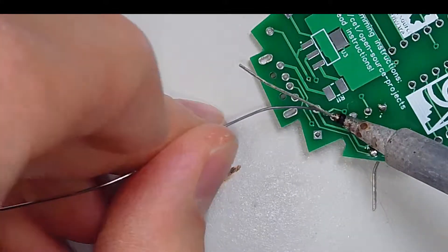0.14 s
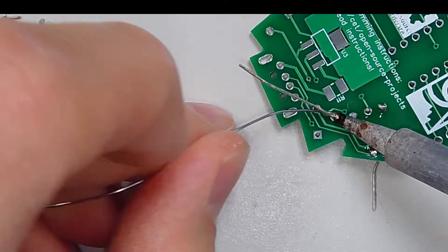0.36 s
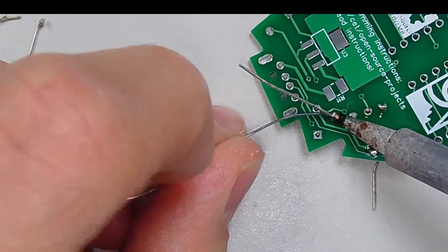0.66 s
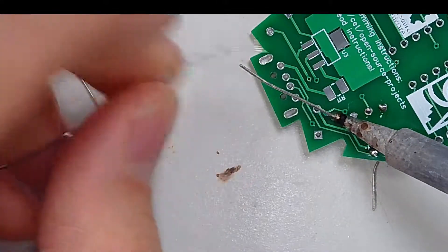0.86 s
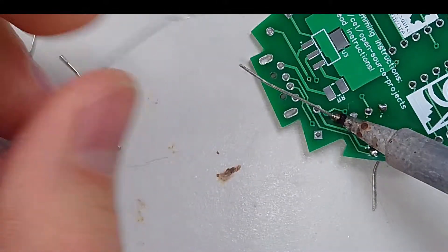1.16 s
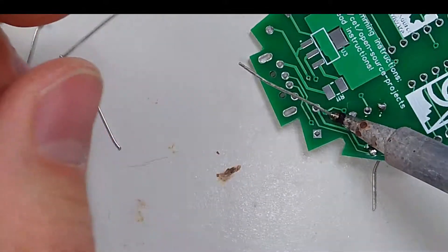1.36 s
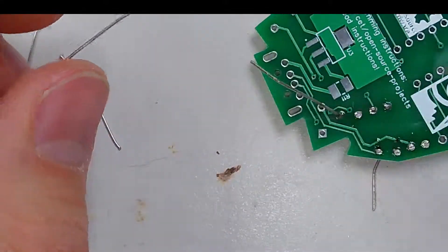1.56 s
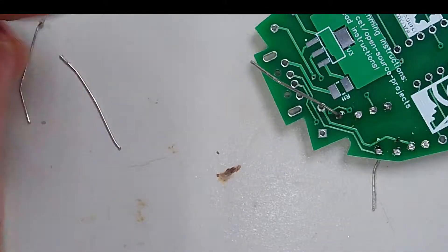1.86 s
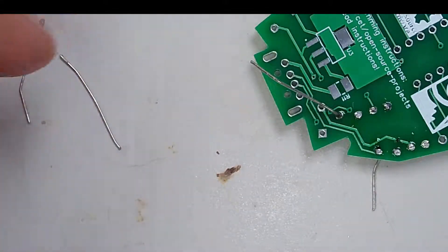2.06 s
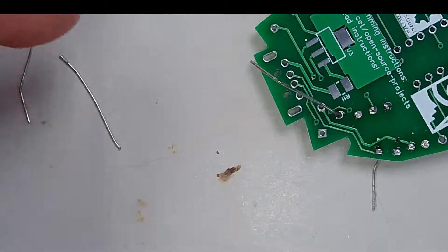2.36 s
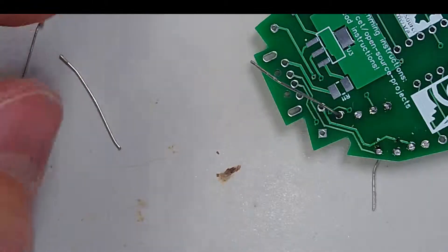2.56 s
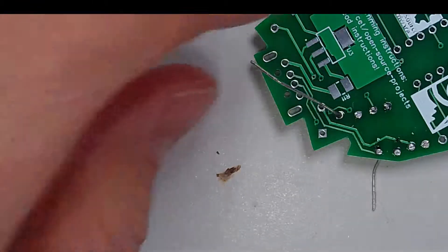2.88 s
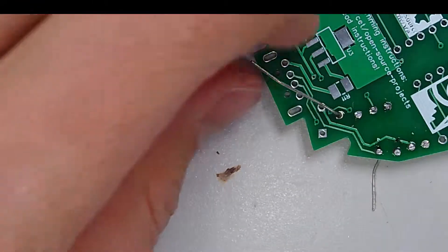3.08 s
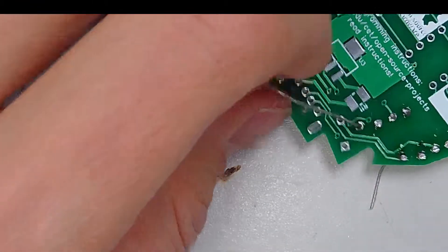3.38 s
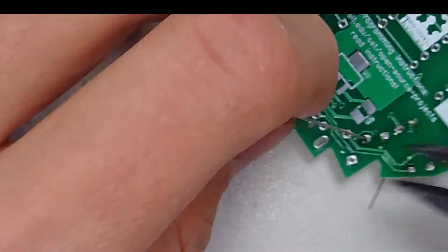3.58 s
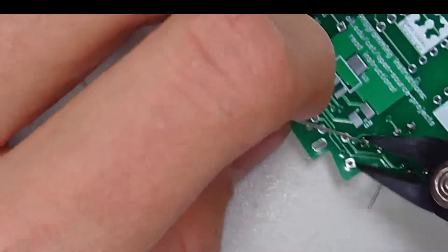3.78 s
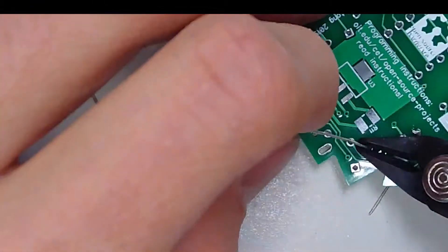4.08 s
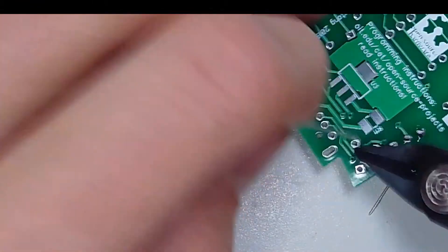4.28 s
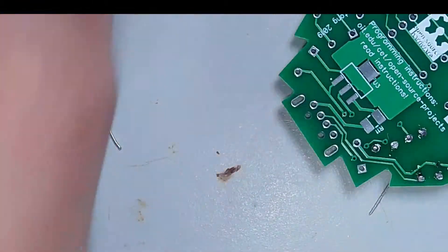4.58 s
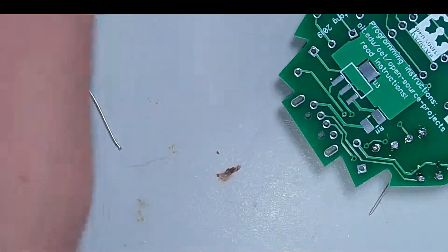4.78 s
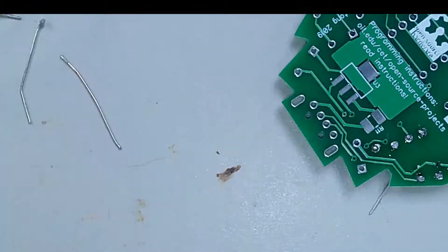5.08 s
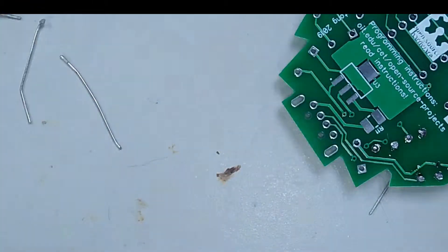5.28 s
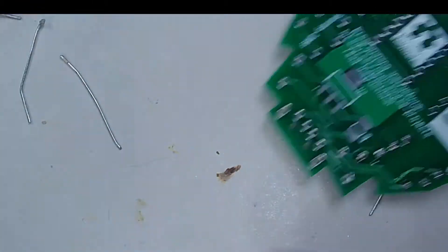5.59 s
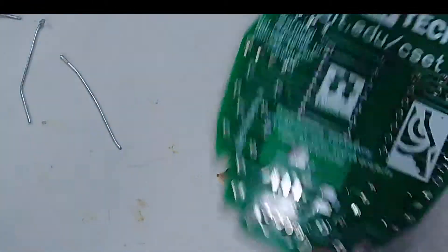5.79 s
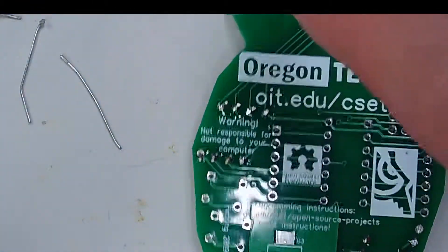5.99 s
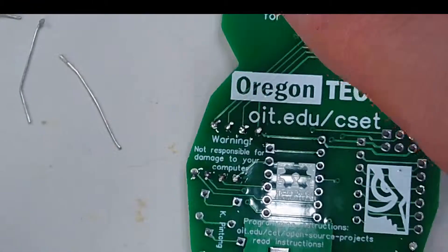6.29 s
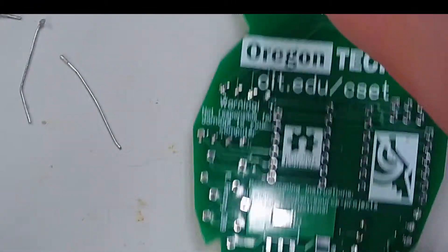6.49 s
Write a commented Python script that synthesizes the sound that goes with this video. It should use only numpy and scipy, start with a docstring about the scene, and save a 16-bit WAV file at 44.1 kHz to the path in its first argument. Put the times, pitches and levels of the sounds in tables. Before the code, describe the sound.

Small wire ticks, crisp cutter snaps, a steel tool clacking down, hard bench knocks and light board scraping, with a steady low room hum.

```python
"""At a hard bench in a ventilated room, flush cutters snip wire leads on a circuit board, tools are set down,
and the board is slid and nudged. Impacts are noise cracks with decaying modes; bouncing, sliding and handling
are random contacts that excite resonances; skin brushes as hiss; ventilation rumbles in the low room modes. One
close microphone hears it all; a duller, fainter microphone track is mixed in slightly ahead, so each loud blow
is foretold by a soft copy of itself."""
import sys
import numpy as np
from scipy import signal
from scipy.fft import rfft, irfft, next_fast_len
from scipy.io import wavfile

SR = 44100
rng = np.random.default_rng(int(sys.argv[2]) if len(sys.argv) > 2 else 0)


def boost_factor(decibels):
    """Convert a level in decibels to a linear amplitude factor."""
    exponent = np.asarray(decibels, float) / 20
    return 10 ** exponent


def generate_wav(signal):
    """Clip the signal to [-1, 1] and save it as 16-bit WAV at the path in sys.argv[1]."""
    frames = np.transpose(np.atleast_2d(signal))
    scaled = np.clip(frames, -1, 1) * 32767
    pcm = np.round(scaled).astype(np.int16)
    wavfile.write(sys.argv[1], SR, pcm)


N = 292956   # length [samples]


def rms_one(x):
    """Normalisation: scale to rms 1."""
    return x / np.sqrt(np.mean(x ** 2) + 1e-20)


def band(x, low_hz, high_hz):
    """Linear filtering: a Butterworth band-pass."""
    sos = signal.butter(2, [low_hz, min(high_hz, .45 * SR)], "band", fs=SR, output="sos")
    return signal.sosfilt(sos, x)


def ring(clicks, hz, t60):
    """Damped resonance: a unit click sets a decaying sine of initial height 1 ringing."""
    radius, angle = boost_factor(-60 / (t60 * SR)), 2 * np.pi * hz / SR
    # the tiny offset keeps the decay clear of denormal numbers
    return signal.lfilter([0, np.sin(angle)], [1, -2 * radius * np.cos(angle), radius ** 2], clicks + 1e-18)


def strokes(start_s, held_s, db, rise_db_per_s, fall_db_per_s):
    """Exponential envelope: each stroke rises to its level, holds it and dies away."""
    t, out = np.arange(N) / SR, np.zeros(N)
    for start, held, level_db, fall in np.broadcast(start_s, held_s, db, fall_db_per_s):
        near = slice(max(int((start - 1) * SR), 0), int((start + held + 1) * SR))
        before = np.maximum(start - t[near], 0)
        after = np.maximum(t[near] - start - held, 0)
        out[near] += boost_factor(level_db - rise_db_per_s * before - fall * after)
    return out


def grains(per_s, spread_db):
    """Random impulse process: sparse clicks with a long tail of sizes; rms 1."""
    sizes = boost_factor(spread_db * np.minimum(rng.exponential(1, N), 4)) * rng.choice([-1, 1], N)
    return rms_one(sizes * (rng.random(N) < per_s / SR))


def clumps(low_per_s, high_per_s, depth_db):
    """Random amplitude modulation: a gain that comes and goes by chance; rms 1."""
    return rms_one(boost_factor(depth_db * rms_one(band(rng.standard_normal(N), low_per_s, high_per_s))))


# edges of the four bands of a crack: bass, low middle, treble, top [Hz]
CRACK_BAND_EDGES = (200, 1200, 4000, 9000, 15000)


def blows(events, modes, colour_db, rise_s, crack_s, touch_s, crack_db, ring_db, vary_db):
    """Impact excitation: a short crack of noise in four bands, and clicks that strike the modes of the body afresh."""
    rows = np.array(events, float)
    time_s, level, thud, edge = np.pad(rows, ((0, 0), (0, 4 - rows.shape[1]))).T   # no thud or edge given: 0 dB
    at = np.round(time_s * SR).astype(int)
    bass_db, middle_db, top_db = colour_db
    levels_db = np.array([level + bass_db + thud,
                          level + middle_db + 0.72 * thud,   # share of the thud [dB] reaching the low middle
                          level,
                          level + top_db + edge])
    span = np.arange(1024)
    shape = (1 - np.exp(-span / (rise_s * SR))) * np.exp(-span / (crack_s * SR))
    cracks = rng.standard_normal((len(at), 1024)) * shape
    strengths_db = vary_db * rng.standard_normal((len(at), len(modes)))
    lags = rng.random((len(at), len(modes))) * touch_s * SR   # modes are not struck at one instant
    out = np.zeros(N)
    for low, high, db in zip(CRACK_BAND_EDGES, CRACK_BAND_EDGES[1:], levels_db):
        train = np.full(N, 1e-18)
        np.add.at(train, at[:, None] + span, boost_factor(db + crack_db)[:, None] * cracks)
        even_out = np.sqrt(SR / 2 / (high - low))   # unit noise in every band
        out += band(band(train, low, high), low, high) * even_out
    for k, (hz, mode_db, t60) in enumerate(modes):
        clicks = np.zeros(N)
        home = np.clip(np.searchsorted(CRACK_BAND_EDGES, hz) - 1, 0, 3)   # the band holding this mode
        size = boost_factor(levels_db[home] + mode_db + ring_db + strengths_db[:, k])
        np.add.at(clicks, at + lags[:, k].astype(int), size)
        out += ring(clicks, hz, t60)
    return out


# spectrum of the ventilation noise before the room modes: (frequency [Hz], relative density [dB per Hz])
VENTILATION_SPECTRUM = [(8.8, -30.5), (15, -2.5), (75, 0), (92, -13.5), (135, 0), (176, -19), (243, -25),
                        (265, -27.5), (449, -33.5), (490, -39.5), (535, -36.5), (3110, -49), (4290, -51.5),
                        (12000, -55), (16500, -58.5)]
# low modes of the room: (frequency [Hz], width [Hz], rise or dip [dB])
LOW_ROOM_MODES = [(29.8, 66, 6), (58.6, 34, -8.5), (77, 3.5, 5), (120, 22, 1), (132, 4.4, -0.5),
                  (161, 10, 6), (199, 8.9, 0), (239.7, 14, 10), (256, 30, 2)]


def air():
    """Modal colouring of broadband noise: ventilation, lifted or dipped at the room's low modes."""
    size = next_fast_len(N)
    hz = np.maximum(np.arange(size // 2 + 1) * SR / size, 1)
    points = np.array(VENTILATION_SPECTRUM)
    colour_db = np.interp(np.log(hz), np.log(points[:, 0]), points[:, 1])
    for centre_hz, width_hz, rise_db in LOW_ROOM_MODES:
        colour_db += rise_db / (1 + (2 * (hz - centre_hz) / width_hz) ** 2)
    noise = irfft(rfft(rng.standard_normal(size)) * boost_factor(colour_db), size)[:N]
    return boost_factor(-40) * rms_one(noise)


# reverberation time of the room: (frequency [Hz], decay by 60 dB [s])
REVERBERATION = [(250, 0.46), (1000, 0.14), (4000, 0.2), (12000, .12)]


def room(x):
    """Reverberation by convolution: the room answers with noise decaying at a rate set for each octave."""
    t, points, answer = np.arange(SR // 2) / SR, np.array(REVERBERATION), 0
    for hz in 150 * 2.0 ** np.arange(7):
        t60 = np.interp(np.log(hz), np.log(points[:, 0]), points[:, 1])
        answer = answer + band(rng.standard_normal(len(t)), hz, 2 * hz) * boost_factor(-60 * t / t60)
    answer *= 1 - np.exp(-t / 0.0025)   # soft onset
    unit_answer = answer / np.sqrt(np.sum(answer ** 2))
    return boost_factor(-14) * signal.fftconvolve(x, unit_answer)[:N]


def far_track(x):
    """Time offset and dispersion: the second track leads, is dull, and smears each attack over a few ms."""
    lead, size = round(.056 * SR), round(.011 * SR)   # [s] to samples
    smear = rms_one(rng.standard_normal(2048)[:size] * np.hanning(size)) / np.sqrt(size)
    early = np.append(signal.oaconvolve(x, smear, "same")[lead:], np.zeros(lead))
    return boost_factor(-16.5) * band(band(early, 250, 2100), 120, 7500)


# skin brushing the bench: (start [s], held [s], level [dB])
BRUSH_STROKES = [(.7, .03, -70), (1.901, .38, -70.5), (2.75, 0.34, -65.5), (3.31, .02, -73.5),
                 (3.75, 0.07, -78.5), (5.0, 0.49, -65.5)]


def brush():
    """Friction noise: skin on the bench is a smooth band of hiss."""
    hiss = rms_one(band(rng.standard_normal(N), 3800, 10000))
    return strokes(*np.transpose(BRUSH_STROKES), rise_db_per_s=122.5, fall_db_per_s=203) * hiss


# a squeaking fingertip: (start [s], held [s], level [dB], frequency at the start [Hz], glide [Hz per s])
FINGER_SQUEAKS = [(2.76, 0.25, -66.5, 2220, 252), (5.372, 0.058, -70, 2400, 2020)]


def squeak():
    """Modulated carrier: a fingertip squeaks as a gliding tone multiplied by slow noise, a narrow band."""
    out, t = np.zeros(N), np.arange(N) / SR
    for start, held, db, hz, glide in FINGER_SQUEAKS:
        waver = rms_one(band(rng.standard_normal(N), 19.0, 130))
        tone = np.cos(2 * np.pi * (hz + glide * (t - start) / 2) * (t - start))
        out += strokes([start], held, db, rise_db_per_s=600, fall_db_per_s=600) * waver * tone
    return out


# ticks of solder wire and cut leads: (time [s], nominal level before colour and crack or ring gain [dB])
LEAD_TICKS = [(0.6729, -44.5), (0.7148, -51), (0.8274, -60), (1.1513, -34.5), (1.1613, -37),
              (1.1757, -36.5), (1.1954, -48.5), (1.6094, -55), (1.7864, -53), (1.8008, -45.5),
              (1.8214, -50), (2.1545, -51), (4.3415, -47), (4.3564, -43.5), (4.3804, -46), (4.3869, -38.5),
              (4.3934, -51)]
# modes of the wire: (frequency [Hz], relative level [dB], decay by 60 dB [s])
WIRE_MODES = [(4250, 2, .022), (4700, -2, .009), (5500, -8, .008), (7600, -10, .01), (10500, -6, .006),
              (13000, -6, .006)]


def wire_ticks():
    """Impact on a light body: solder wire and cut leads tick with little bass."""
    return blows(LEAD_TICKS, WIRE_MODES, colour_db=(-40, -23, -10), rise_s=.0006, crack_s=.003,
                 touch_s=.002, crack_db=-9, ring_db=-6, vary_db=2.0)


# nudges of the board: (time [s], nominal 4-9 kHz level before crack or ring gain [dB],
# thud: bass against that [dB], edge: top octave against that [dB]), both before the colour
BOARD_NUDGES = [(2.5417, -28.5, 3.5, -18), (2.579, -52, -4, -14), (2.6541, -52, -20, -6),
                (2.9258, -37.5, -23, -4), (2.9703, -45.5, -20, -8), (3.0006, -44, -3, -3),
                (3.3907, -53.5, 13.5, -10), (3.4044, -52, 16.5, 4), (3.465, -55, 9.5, 2),
                (3.7347, -58.5, 17, 3), (3.7988, -45.5, 14.5, 6), (3.8143, -47, -28, 2),
                (3.9287, -58, 7.5, -15), (4.9164, -35, -25, 4), (4.9284, -43.5, -27, 9),
                (5.0328, -35.5, -4, -6), (5.182, -41.5, -11, 7), (5.231, -47, -10, 1), (5.253, -44, -16, 3),
                (5.2622, -40.5, -25, -5), (5.3056, -45.5, -22, -5), (5.5205, -36.5, -16, -1),
                (5.5939, -39.5, -15.5, 6), (5.8197, -48, -2, 3), (5.8444, -40, 0, -0.5),
                (5.9344, -50, -6, 10.5), (6.0666, -38.5, 3, 0), (6.0858, -50.5, 9, 10),
                (6.1007, -48, 10.5, 6), (6.158, -36.5, 4, -1), (6.4214, -48.5, -12, 4), (6.4354, -56, 0, 9),
                (6.4452, -48, 6, 8.5), (6.5238, -48.5, -10, 22), (6.5314, -46, 2, 6)]
# modes of the circuit board: (frequency [Hz], relative level [dB], decay by 60 dB [s])
BOARD_MODES = [(577, -7, 0.056), (940, -12, 0.036), (1424, -8, 0.04), (2730, 0.5, 0.0033),
               (5220, -7.5, 0.017), (6150, -6, 0.018), (6875, 7, 0.022), (7580, 5, 0.018), (9600, 2, 0.016),
               (10580, 2.5, 0.015), (11460, -5.5, 0.02), (12480, -1.5, 0.0048), (14030, -12.5, 0.0078)]


def board_ticks():
    """Impact on a plate: the nudged board ticks in its own modes."""
    return blows(BOARD_NUDGES, BOARD_MODES, colour_db=(0, -4, -2), rise_s=0.0021, crack_s=0.0021,
                 touch_s=0.00052, crack_db=-2.5, ring_db=-10, vary_db=6.0)


# slides of the board on its joints: (start [s], held [s], level of the high part [dB], low part against that [dB])
BOARD_SLIDES = [(2.93, 0.057, -59.5, -2.5), (5.525, 0.18, -51.5, 1), (5.742, 0.027, -43.5, -3),
                (5.801, 0.034, -57, 4.5), (5.9, 0.15, -72.5, -7), (6.319, 0.033, -66.5, -2.5),
                (6.43, 0.049, -63.5, 1), (6.55, 0.12, -78, 7)]


def slide():
    """Friction as random impulses: joints catch on the bench grain; each board mode has its own feed, in swells."""
    catch = grains(per_s=3000.0, spread_db=4.0)
    swell = clumps(6.0, 50.0, depth_db=4.5)
    rung = []
    for k, (hz, db, t60) in enumerate(BOARD_MODES):   # shifted copies serve as separate joints
        rung.append(boost_factor(db) * np.roll(swell, 7001 * k) * ring(np.roll(catch, 9001 * k), hz, t60))
    scrape = sum(np.roll(swell, hz) * band(np.roll(catch, hz), hz, 1.5 * hz) for hz in (3000, 4500, 6700, 10000))
    high = rms_one(sum(rung[4:])) + boost_factor(-4) * rms_one(scrape)
    low = boost_factor(-2.5) * rms_one(sum(rung[:4])) + boost_factor(-7) * rms_one(band(catch, 540, 2380))
    start, held, db, low_db = np.transpose(BOARD_SLIDES)
    rise, fall = 602, 301   # [dB per s]
    return strokes(start, held, db, rise, fall) * high + strokes(start, held, db + low_db, rise, fall) * low


# modes of the bench: (frequency [Hz], relative level [dB], decay by 60 dB [s])
BENCH_MODES = [(248, -9, .1), (440, -3, .04), (600, -1, .03), (780, -8, .02), (1039, -5, .025),
               (1400, -6, .02), (1800, -6, .02), (2347, -2, .025), (2600, -6, .02), (3300, -2, .015),
               (5000, -4, .015), (6449, -4, .015), (7284, -2, .015), (8156, -8, .012)]
# the bench rattling as things are handled: (start [s], held [s], level [dB], dying [dB per s])
BENCH_RATTLE = [(3.09, 0.0016, -38, 500), (4.618, .002, -35, 795.5), (4.652, 0.0036, -34, 336),
                (4.762, 0.012, -33, 1001), (4.821, 0.0014, -26.5, 303.5)]


def bench_rattle():
    """Repeated contact: handling rattles the bench in uneven small touches that ring the lower bench modes."""
    touch = band(grains(per_s=900.0, spread_db=6.5), 370, 1600)   # soft contacts
    rung = sum(boost_factor(db) * ring(touch, hz, t60) for hz, db, t60 in BENCH_MODES if 300 < hz < 3000)
    body = rms_one(rms_one(rung) + boost_factor(-2.5) * rms_one(band(touch, 550, 1300)))
    start, held, db, fall = np.transpose(BENCH_RATTLE)
    return strokes(start, held, db, 2496.5, fall) * body


# knocks on the bench: (time [s], nominal 4-9 kHz level before crack or ring gain [dB],
# thud: bass against that [dB], edge: top octave against that [dB])
KNOCKS = [(3.0802, -32, 8.5, -22.5), (4.612, -3, -8.5, -14), (4.6515, -17.5, -4.5, -20.5),
          (4.6661, -9, -11, -30.5), (4.6741, -23.5, 0, -31.5), (4.818, -24.5, 14, -5),
          (4.852, -16.5, 2, -17)]


def bench_knocks():
    """Impact on a heavy surface: knocks ring the short modes of the bench."""
    return blows(KNOCKS, BENCH_MODES, colour_db=(0, 7, 0), rise_s=.0001, crack_s=0.001,
                 touch_s=.001, crack_db=-3, ring_db=-10.5, vary_db=-1.5)


# steel set down: (time [s], nominal 4-9 kHz level before crack or ring gain [dB],
# thud: bass against that [dB], edge: top octave against that [dB])
DROPS = [(2.3337, -8, -6, -19.5), (2.3774, -19.5, 4, -27), (2.4163, -36.5, 16, -11.5)]
# modes of the steel tool: (frequency [Hz], relative level [dB], decay by 60 dB [s])
STEEL_MODES = [(245, 1, .13), (330, -8, .06), (420, -10, .04), (554, 1, .06), (1100, -10, .04),
               (2067, -6, .07), (2665, -10, .05), (3720, -8, .09), (5165, -12, .12), (6514, -6, .12),
               (7445, -6, .1), (8113, 2, .035), (9453, -6, .05)]


def steel_drops():
    """Impact on a lightly damped body: steel set down rings longer than the bench."""
    return blows(DROPS, STEEL_MODES, colour_db=(0, 1.5, 0), rise_s=0.00069, crack_s=0.0045,
                 touch_s=.00002, crack_db=-7.0, ring_db=-13, vary_db=6.5)


# modes of the cutter: (frequency [Hz], relative level [dB], decay by 60 dB [s])
CUTTER_MODES = [(930, -4, .03), (1040, 1, .035), (2905, -4, .045), (4700, -8, .012), (6200, 0, .015),
                (7036, -6, .03), (7400, 0, .012), (7623, -8, .035), (8592, -6, .01), (9600, -7, .014),
                (10900, -8, .014), (12340, -7, .014), (13000, -8, .014), (14600, -6, .012)]
# loose leads skittering after a blow: (start [s], held [s], level of the body [dB],
# finest treble against that [dB], dying [dB per s])
LEAD_SKITTER = [(1.376, 0.015, -35.5, -6, 422), (2.345, 0.034, -39.5, -21, 228.5),
                (2.547, 0.0021, -49.5, -22.5, 500), (3.358, 0.0023, -62.5, 4.5, 311),
                (4.077, 0.012, -40, -1.5, 376), (4.215, 0.022, -33, -3, 595.5),
                (4.922, 0.0027, -45, -2, 904)]


def skitter():
    """Dense random impacts: loose wire ends and parts bounce, partly ringing the cutter; the finest go on longer."""
    bounce = grains(per_s=11000.0, spread_db=6.0) * clumps(60.0, 250.0, depth_db=4.0)
    rung = sum(boost_factor(db) * ring(bounce, hz, t60) for hz, db, t60 in CUTTER_MODES if 2500 < hz < 9000)
    rattle = band(band(bounce, 1100, 9000), 380, 9500)
    body = rms_one(rms_one(rung) * boost_factor(3.5) + rms_one(rattle))
    # each high mode is fed by a shifted copy of the bounces
    chinks = sum(boost_factor(db) * ring(np.roll(bounce, hz), hz, t60) for hz, db, t60 in CUTTER_MODES if hz > 9000)
    top = rms_one(rms_one(chinks) + boost_factor(-2.5) * rms_one(band(bounce, 7700, 15500)))
    start, held, db, treble_db, fall = np.transpose(LEAD_SKITTER)
    rise, lingers_s = 3996.5, 0.0084   # [dB per s], [s]
    return (strokes(start, held, db, rise, fall) * body
            + strokes(start, held + lingers_s, db + treble_db, rise, fall) * top)


# snips of the cutter and its bounces after them: (time [s], nominal 4-9 kHz level before crack or ring gain
# [dB], # thud: bass against that [dB], edge: top octave against that [dB])
CUTTER_SNIPS = [(1.3666, -3, -33, -3.5), (1.391, -14.5, -17.5, -21), (1.4009, -21, -31, -13),
                (3.3509, -34.5, -16.5, 11), (4.0372, -39.5, 4, 2.5), (4.0712, -6.5, -14, -9),
                (4.0904, -39.5, 9, -11), (4.1018, -39.5, 10, -7.5), (4.1264, -44, -4.5, -4),
                (4.2109, -14.5, -16.5, 9.5), (4.2254, -15.5, -15, -9.5), (4.2336, -23.5, -16, -11.5)]


def snips():
    """Impact on a stiff tool: each snip, and each bounce after it, cracks and rings the short modes of the
    cutter."""
    return blows(CUTTER_SNIPS, CUTTER_MODES, colour_db=(0, -3, 0), rise_s=0.0005, crack_s=0.0036,
                 touch_s=0.00089, crack_db=-11.5, ring_db=-4.5, vary_db=-1.5)


def treble_width(hits, steady):
    """Side signal: flickering treble, to be added to one channel and taken from the other."""
    flicker = rms_one(band(rng.standard_normal(N), 100, 900))
    hit_treble = band(band(hits, 10500, 17000), 10500, 17000)
    side = flicker * (boost_factor(-3) * hit_treble + boost_factor(-22) * band(steady, 4500, 16000))
    return band(band(side, 6000, 17000), 6000, 17000)


def scene():
    """Superposition: the air, all that happens on the bench, the room's answer and the early track."""
    steady = air() + brush() + squeak()
    hits = wire_ticks() + board_ticks() + bench_knocks() + steel_drops() + skitter() + snips()
    bench = hits + slide() + bench_rattle()
    wet = room(bench)
    early = far_track(hits + boost_factor(11.5) * wet)   # the far microphone hears more room
    return bench + wet + early + steady + treble_width(hits, steady) * [[1], [-1]]


def roll_off(x):
    """The treble ends steeply here."""
    return signal.sosfilt(signal.butter(12, 16820, fs=SR, output="sos"), x)


def record(dry):
    """Band limiting and soft saturation: the top treble is cut; loud cracks are rounded alike in both channels."""
    dry = signal.sosfilt(signal.cheby2(10, 25, 16150, fs=SR, output="sos"), dry)
    mid = dry.mean(axis=0)
    overload = .95   # amplitude that the rounded mid signal approaches
    mix = dry - mid + overload * np.tanh(mid / overload)
    return roll_off(mix)


dry = scene()
out = record(dry)
generate_wav(out)
```